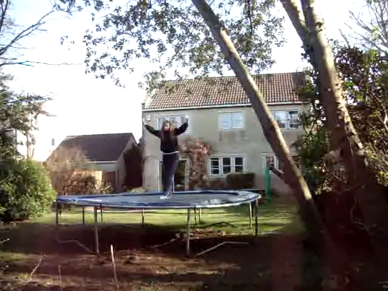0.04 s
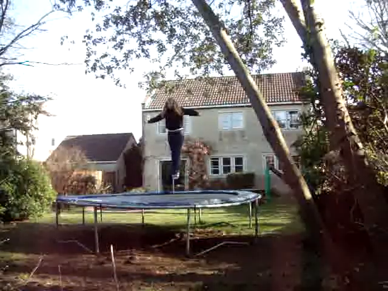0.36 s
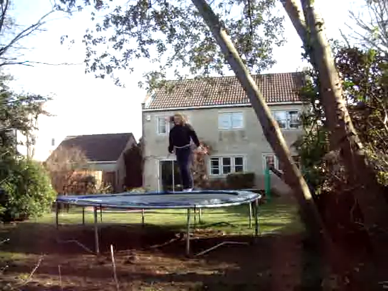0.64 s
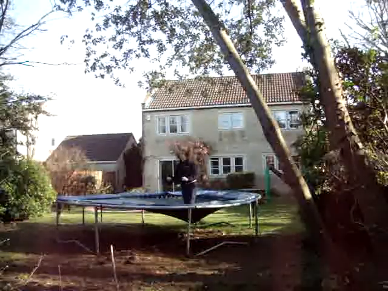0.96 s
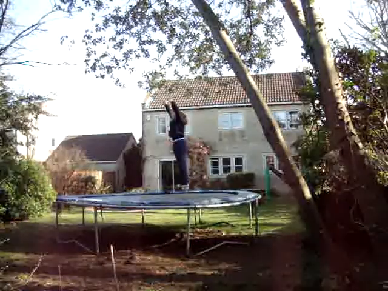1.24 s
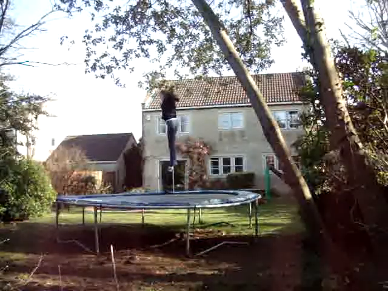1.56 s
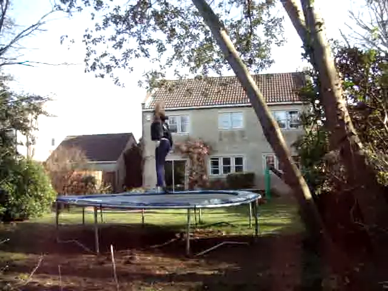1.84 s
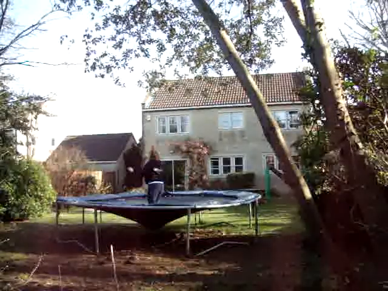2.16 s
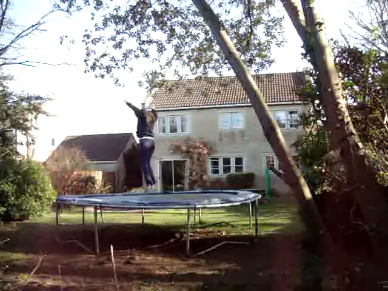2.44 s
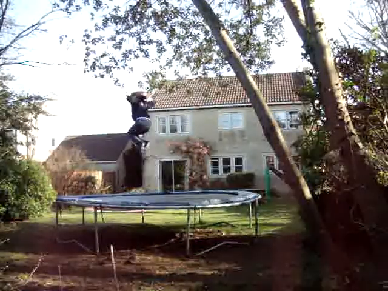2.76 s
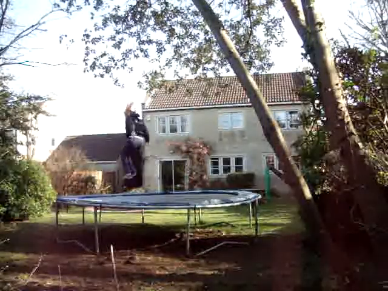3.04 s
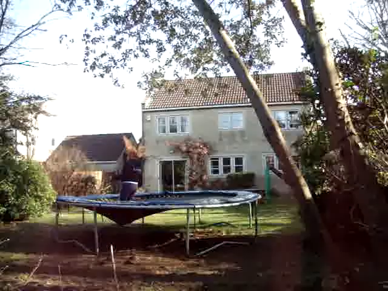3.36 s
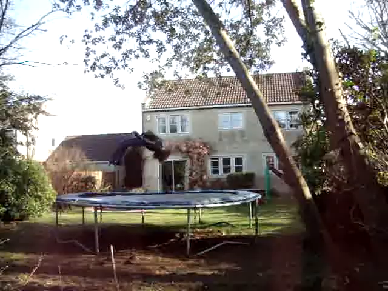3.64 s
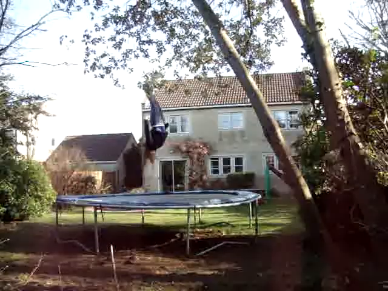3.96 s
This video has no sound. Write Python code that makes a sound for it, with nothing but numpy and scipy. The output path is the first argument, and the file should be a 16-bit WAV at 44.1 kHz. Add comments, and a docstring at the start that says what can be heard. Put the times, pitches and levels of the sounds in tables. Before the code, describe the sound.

Someone bounces on a garden trampoline, springs creaking and mat scuffing over a distant traffic rush.

```python
"""First come a rasp of steel springs and a scuff of the mat: someone bounces on a garden trampoline.
The springs rasp as their hooks slip, and ring as they stretch and let go. The mat thumps softly
at each landing, and the frame knocks now and then. Behind it a rush like a distant car draws
nearer, over a light hiss; the house wall answers the rasps and scuffs faintly."""
import sys
import numpy as np
from scipy import signal
from scipy.fft import rfft, irfft, next_fast_len
from scipy.io import wavfile
from scipy.ndimage import map_coordinates

SR = 44100
rng = np.random.default_rng(int(sys.argv[2]) if len(sys.argv) > 2 else 0)


def master_out(mix):
    """Clip the mix to full scale and print it as 16-bit PCM to the path in sys.argv[1]."""
    frames = np.transpose(np.atleast_2d(mix))
    ceiling = np.clip(frames, -1, 1)
    pcm = np.round(ceiling * 32767).astype(np.int16)
    wavfile.write(sys.argv[1], SR, pcm)


N = 176400  # 4 seconds

# A "colour" says how strong each pitch is next to the others. A "fade" is the time to drop by 60 dB.
# colour of the still garden air (f/Hz, level/dB)
AIR_COLOUR = [(15, -60), (25, -26), (59, -21.5), (81, -13), (134, -13), (232, -8.5), (423, -2), (647, -13),
              (697, -29), (751, 0.5), (989, -15), (1070, 1.5), (1630, -10), (6460, -17.5), (9890, -21),
              (12900, -73), (21800, -120)]
# swell of the car's low drone, before DRONE_GAIN_DB is added (t/s, level/dB)
DRONE_SWELL = [(0, -61.5), (.8, -58.5), (1.55, -51.5), (2.4, -51), (3.2, -47.5), (3.6, -43.5), (4, -44)]
# colour of that drone (f/Hz, level/dB)
DRONE_COLOUR = [(25, -43), (60, -26), (110, -17), (145, -16.5), (168, -9.5), (190, -9.5), (247, 1),
                (275, -2), (300, -9.5), (335, -10), (360, -1.5), (397, 1.5), (440, -6), (600, -22.5),
                (2000, -64)]
# swell of the tyre roar, before TYRE_GAIN_DB is added (t/s, level/dB)
TYRE_SWELL = [(0.0, -48.5), (0.31, -53.5), (0.89, -49.5), (1.17, -47), (1.61, -47.5), (2.03, -44.5),
              (2.35, -42), (3.54, -35.5), (3.66, -34.5), (4.0, -34)]
# colour of the tyre roar (f/Hz, level/dB)
TYRE_COLOUR = [(25, -57), (110, -30.5), (300, -15.5), (480, -7), (560, -1.5), (670, 1), (770, -1), (845, 1),
               (1100, -6), (1600, -14.5), (2500, -24.5), (4500, -37), (10000, -46)]
# how long the yard echoes at each pitch (f/Hz, fade/s)
ECHO_FADES = [(200, 0.9), (2000, 0.92), (5000, 0.89), (10000, 0.4)]
# the mat takes the jumper's weight (t/s, level/dB)
LANDINGS = [(.92, -61), (2.08, -69), (3.47, -59.5)]
# colour of a landing's thump (f/Hz, level/dB)
THUMP_COLOUR = [(25, -26), (50, -14), (75, -6), (120, -1.5), (200, -3.5), (320, -1), (700, -36),
                (2000, -57)]
# the frame's joints knock (t/s, level/dB)
KNOCKS = [(0.2373, -34.5), (0.2404, -38), (2.233, -32.5), (2.237, -34), (3.498, -28.5), (3.885, -29.5),
          (3.897, -30.5)]
# tones a knocked joint rings with (f/Hz, relative level/dB, fade/s)
FRAME_TONES = [(1155, 2, .022), (1350, -2.5, 0.038), (1700, -6.5, 0.014), (2014, 2.5, 0.016)]
# colour of the crack that starts a knock (f/Hz, level/dB)
CRACK_COLOUR = [(100, -49), (500, -32), (900, -16), (1200, -1.5), (2000, -6), (2600, -8), (4500, -9),
                (7000, -5), (10000, -22)]
# feet and cloth drag on the mat (t/s, length/s, level/dB)
SCUFFS = [(0.012, 0.018, -46), (0.081, 0.043, -44), (.914, 0.083, -45), (1.079, 0.09, -46),
          (1.207, 0.048, -51), (2.095, 0.016, -49), (2.189, 0.068, -42), (2.332, 0.14, -49),
          (3.313, 0.024, -46.5), (3.391, .025, -39), (3.469, 0.058, -33.5), (3.591, 0.034, -39.5),
          (3.851, .01, -38.5), (3.884, 0.028, -38)]
# colour of the rubbed mat (f/Hz, level/dB)
MAT_COLOUR = [(40, -38), (150, -23.5), (500, -6), (950, 2), (1400, 3.5), (2000, -5.5), (3000, -6),
              (5000, -16), (10000, -29)]
# one coil sings on after the later bounces (t/s, level/dB)
PINGS = [(2.36, -54), (2.69, -52), (3.6, -48)]
# spring hooks slip on the frame (t/s, length/s, level/dB, brightness/dB per octave, squeak f/Hz)
CREAKS = [(0.0, 0.061, -44.5, -2, 4120), (0.089, .033, -47, 1.5, 3350), (.914, 0.0061, -45.5, -2.5, 3300),
          (0.95, 0.011, -46.5, -2.5, 3560), (.995, 0.049, -38, 5, 4350), (1.045, 0.044, -50, 0, 4600),
          (1.123, 0.0065, -40.5, 2, 5700), (1.2, 0.029, -46, -2.5, 2935), (1.268, .004, -47, -2.5, 2150),
          (2.055, 0.0072, -40.5, -6, 3700), (2.106, 0.0092, -47.5, -5, 2150), (2.17, 0.018, -48, 0, 5500),
          (2.199, 0.078, -48.5, 4, 4950), (2.322, .033, -42.5, -1, 5500), (2.365, 0.03, -43.5, 0.5, 3960),
          (2.463, .014, -42.5, -4.5, 3000), (2.686, .012, -42, -1.5, 2810), (2.711, .01, -42.5, -4, 4300),
          (3.374, 0.018, -41.5, -4, 3080), (3.4, 0.015, -33.5, -2.5, 1920), (3.502, 0.0086, -30.5, 1, 5500),
          (3.538, 0.022, -40, 2, 2900), (3.584, 0.038, -43, 1, 2770), (3.671, 0.026, -41, 10, 6100),
          (3.888, 0.016, -38, -4.5, 4410), (3.915, 0.021, -43, -3, 3000)]
# colour of a rasping hook (f/Hz, level/dB)
HOOK_COLOUR = [(100, -47), (300, -23.5), (900, -11), (1400, -0.5), (2200, 1), (3000, 1), (4200, -0.5),
               (5500, -3.5), (7500, -5.5), (10000, -14.5)]
# tones the springs ring with (f/Hz, relative level/dB, fade/s)
SPRING_TONES = [(1330, -4, .25), (1840, -18.5, 0.17), (1916, 1, 0.16), (2070, 1, 0.19), (2314, -3, .15),
                (2713, -2, .18), (2864, -1.5, .28), (3090, -5, 0.16), (3191, -9, .2), (3580, -2, 0.13),
                (4000, 2.5, .2), (4577, -4, .12), (5980, -3, .1), (7100, -2.5, 0.32)]

AIR_DB, DRONE_GAIN_DB, TYRE_GAIN_DB, ECHO_GAIN_DB = -53, -2, 0.5, -9
SQUEAK_BOOST_DB, SQUEAK_HALF_WIDTH_HZ, SPRING_RING_DB = 8.5, 87, -13.5
SHORT = SR // 2  # each short sound gets half a second
SHORT_T = np.arange(SHORT) / SR


def amp(db):
    """Turn decibels into a number to multiply by."""
    return 10 ** (np.asarray(db) / 20)


def value_at(points, hz):
    """Read between a table's (f/Hz, value) rows, with the octaves evenly spaced."""
    freqs, values = np.transpose(points)
    return np.interp(np.log(hz + 1), np.log(freqs + 1), values)


def filtered(x, gain_at):
    """Multiply each frequency in x by gain_at(frequency)."""
    size = next_fast_len(len(x) + 8192)
    return irfft(rfft(x, size) * gain_at(np.fft.rfftfreq(size, 1 / SR)), size)[:len(x)]


def coloured(x, colour, tilt_db=0):
    """Give x a colour, brighten it by tilt_db per octave, and set its average strength (rms) to 1."""
    def gain_at(hz):
        octaves = np.log2(np.maximum(hz, SR / 50) / SR)  # no tilt below 882 Hz
        return amp(value_at(colour, hz) + tilt_db * octaves)
    shaped = filtered(x, gain_at)
    return shaped / np.sqrt(np.mean(shaped ** 2) + 1e-20)


def noise(length, colour):
    """Random noise with the given colour."""
    return coloured(rng.standard_normal(length), colour)


def wobble(per_s):
    """A smooth curve through per_s random values a second."""
    return map_coordinates(rng.standard_normal(400), [np.arange(N) * per_s / SR], mode="mirror")


def envelope(rise_s, hold_s, fade_s):
    """The loudness of a short sound: it rises, and starts to fade hold_s after it began."""
    rise = np.minimum(SHORT_T / max(rise_s, 1 / SR), 1)
    return rise * np.exp(-np.log(1000) * np.maximum(SHORT_T - hold_s, 0) / fade_s)


def add(track, start_s, sound):
    """Mix a sound into the track at start_s."""
    i = max(round(start_s * SR), 0)
    track[i:i + len(sound)] += sound[:N - i]


def slips(per_s, spread_db):
    """Rubbing surfaces stick and slip, making tiny clicks of random timing and size."""
    clicks = (rng.random(SHORT) < per_s / SR) * np.sign(rng.standard_normal(SHORT))
    return clicks * amp(spread_db * (2 * rng.random(SHORT) - 1))


def garden_air():
    """The open air makes a steady, soft murmur and hiss."""
    return amp(AIR_DB) * noise(N, AIR_COLOUR)


def distant_car():
    """A low drone and the roar of tyres both swell as the car draws nearer."""
    t = np.arange(N) / SR
    tyre_db = np.interp(t, *np.transpose(TYRE_SWELL)) + TYRE_GAIN_DB + 0.61 * wobble(per_s=9)
    drone_db = np.interp(t, *np.transpose(DRONE_SWELL)) + DRONE_GAIN_DB
    return amp(tyre_db) * noise(N, TYRE_COLOUR) + amp(drone_db) * noise(N, DRONE_COLOUR)


def yard_echo(x):
    """The house and trees throw back a blurred echo whose highest pitches die first."""
    hz, t, spectrum = signal.stft(rng.standard_normal(SHORT), SR, nperseg=256)
    fading = np.exp(-np.log(1000) * t / value_at(ECHO_FADES, hz)[:, None])
    _, tail = signal.istft(spectrum * fading, SR, nperseg=256)
    tail = np.pad(tail, (SR // 100, 0))  # arrives 10 ms late
    return amp(ECHO_GAIN_DB) * signal.fftconvolve(x, tail / np.linalg.norm(tail))[:N]


def mat_thumps():
    """The sinking mat pushes a soft puff of air."""
    out = np.zeros(N)
    for start_s, db in LANDINGS:
        puff = noise(SHORT, THUMP_COLOUR) * envelope(rise_s=0.033, hold_s=0.068, fade_s=0.3)
        add(out, start_s, amp(db) * puff)
    return out


def frame_knocks():
    """A joint of the frame clacks: a dry crack and a few tones that die quickly."""
    out = np.zeros(N)
    for start_s, db in KNOCKS:
        ring = np.zeros(SHORT)
        for hz, tone_db, fade_s in FRAME_TONES:
            tone = np.sin(2 * np.pi * (hz * SHORT_T + rng.random()))
            ring += amp(tone_db) * tone * envelope(rise_s=0.00027, hold_s=0, fade_s=fade_s)
        crack = noise(SHORT, CRACK_COLOUR) * envelope(rise_s=0.00024, hold_s=0.00093, fade_s=0.014)
        add(out, start_s, amp(db) * (ring + amp(-6.5) * crack))
    return out


def mat_scuffs():
    """Feet and cloth catch and slip on the woven mat, sounding duller than the hooks."""
    out = np.zeros(N)
    for start_s, length_s, db in SCUFFS:
        rub = coloured(slips(per_s=5000, spread_db=4.5), MAT_COLOUR)
        add(out, start_s, amp(db) * rub * envelope(rise_s=0.0024, hold_s=length_s, fade_s=0.19))
    return out


def coil_pings(hz=2439):
    """One coil rings on with a clear tone as the pull on it eases."""
    out = np.zeros(N)
    ping = np.sin(2 * np.pi * hz * SHORT_T) * envelope(rise_s=0.01, hold_s=0, fade_s=0.9)
    for start_s, db in PINGS:
        add(out, start_s, amp(db) * ping)
    return out


def spring_creaks():
    """Hooks slip in quick bursts, each with its own squeak, and every burst sets the coils ringing."""
    out = np.zeros(N)
    hz, tone_db, fade_s = np.transpose(SPRING_TONES)
    fading = np.exp(-np.log(1000) * SHORT_T / fade_s[:, None])
    tones = np.sin(2 * np.pi * hz[:, None] * SHORT_T) * fading
    for start_s, length_s, db, tilt_db, squeak_hz in CREAKS:
        def squeak(f):
            return amp(SQUEAK_BOOST_DB / (1 + ((f - squeak_hz) / SQUEAK_HALF_WIDTH_HZ) ** 2))
        grit = filtered(slips(per_s=5000, spread_db=2.5), squeak)
        burst = envelope(rise_s=0.0017 + 0.12 * length_s, hold_s=length_s, fade_s=0.063)
        rasp = coloured(grit, HOOK_COLOUR, tilt_db) * burst
        coil = amp(tone_db + 2 * rng.standard_normal(len(hz))) @ tones  # a new blend each time
        ring = signal.fftconvolve(rasp, coil / np.linalg.norm(coil))[:SHORT]
        add(out, start_s, amp(db) * (rasp + amp(SPRING_RING_DB) * ring))
    return out


def scene():
    """Mix the trampoline, car and air into one channel; only the creaks and scuffs echo."""
    rubbing = spring_creaks() + mat_scuffs()
    trampoline = rubbing + yard_echo(rubbing) + coil_pings() + frame_knocks() + mat_thumps()
    return (trampoline + distant_car() + garden_air())[None]


def record(dry):
    """Cut away the very highest pitches, from 10100 Hz up."""
    return np.array([filtered(channel, lambda hz: hz < 10100) for channel in dry])


dry = scene()
out = record(dry)
master_out(out)
```